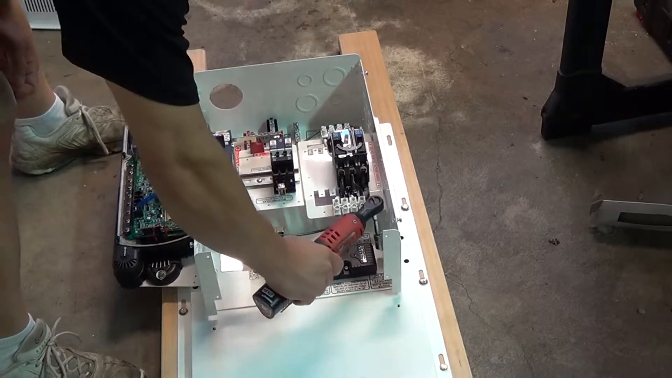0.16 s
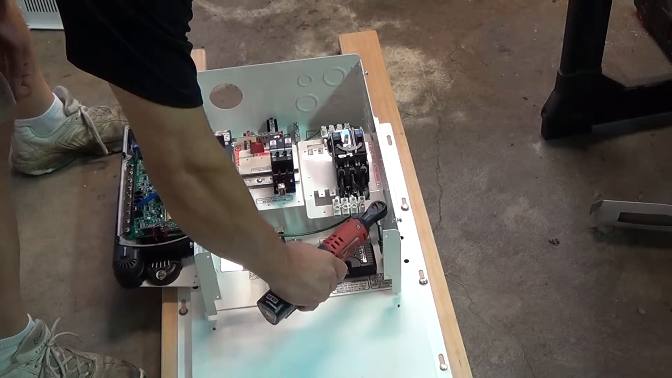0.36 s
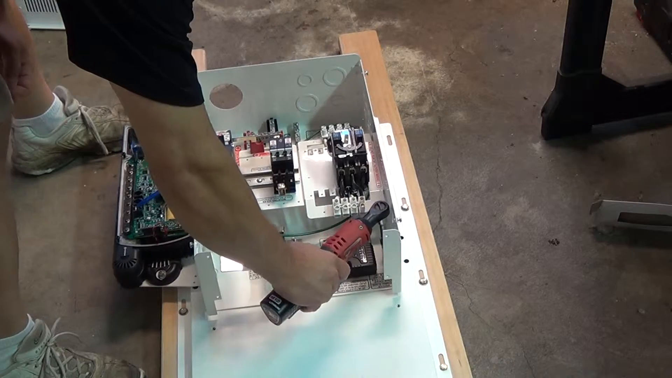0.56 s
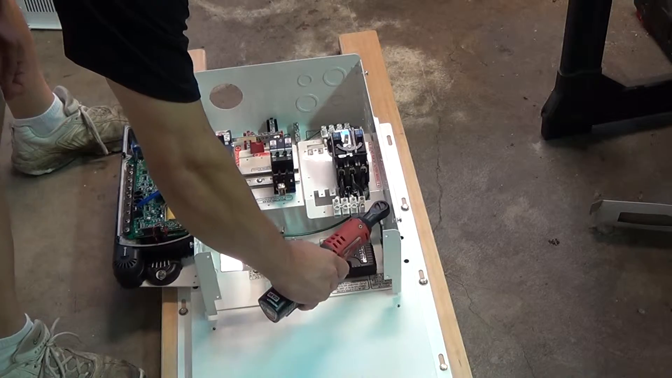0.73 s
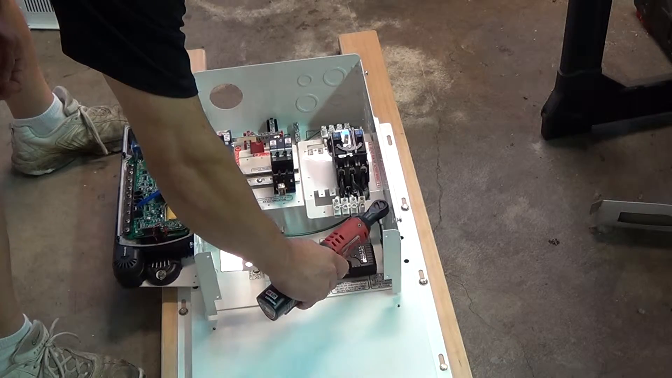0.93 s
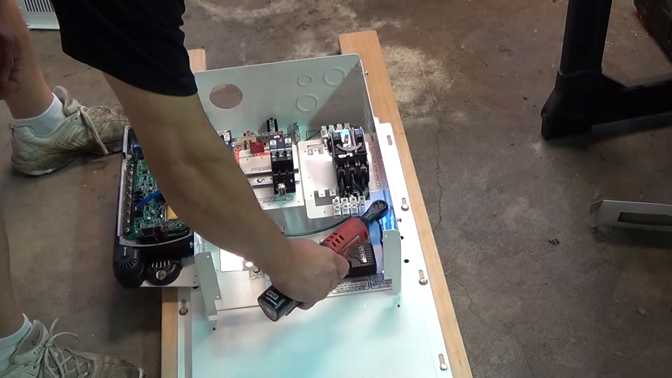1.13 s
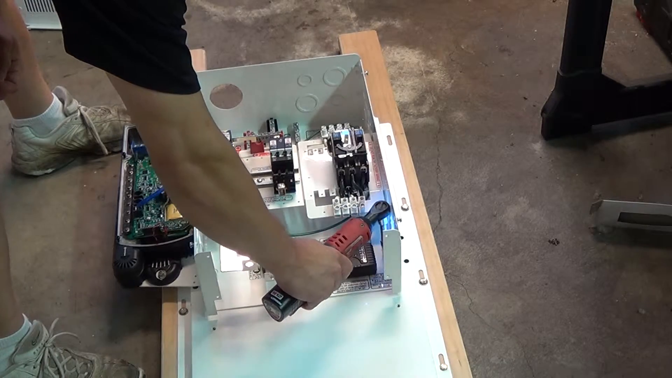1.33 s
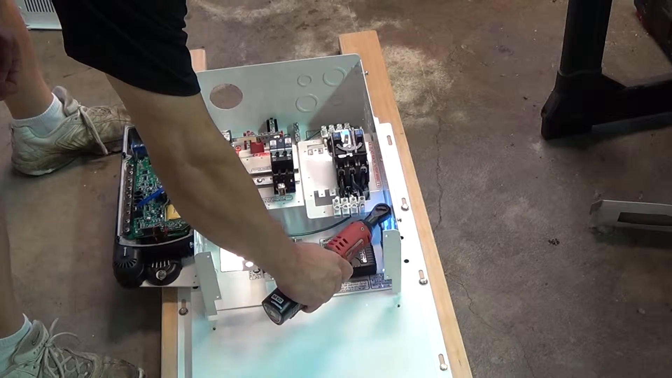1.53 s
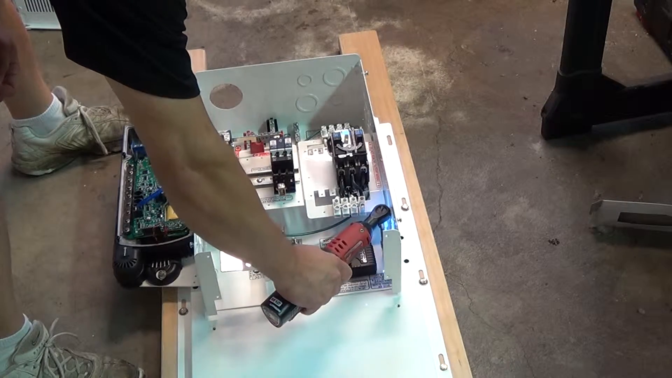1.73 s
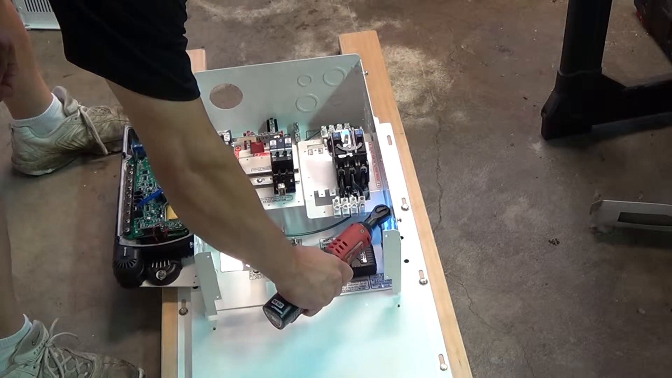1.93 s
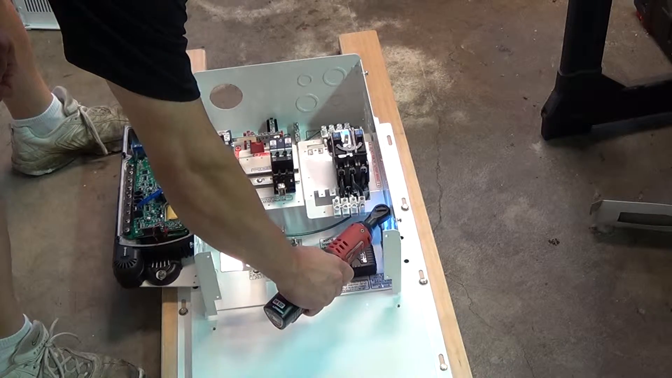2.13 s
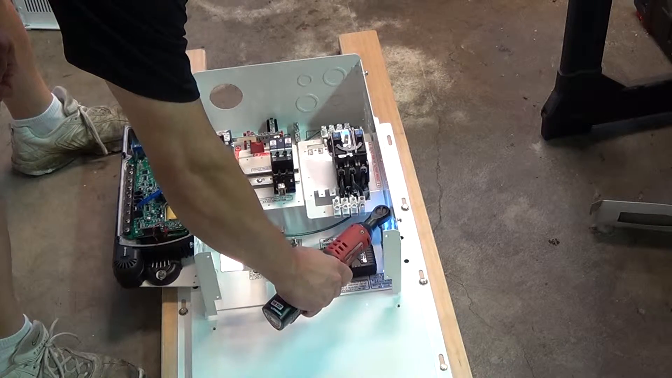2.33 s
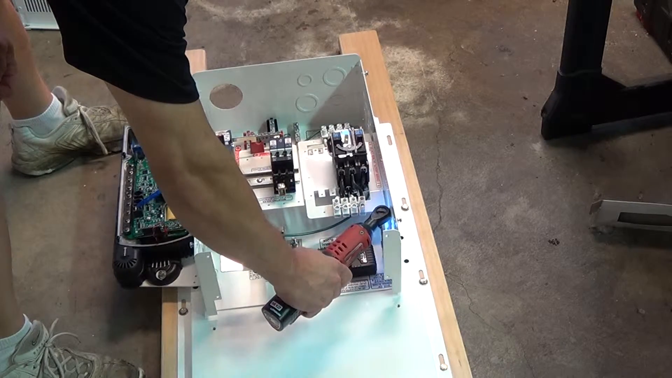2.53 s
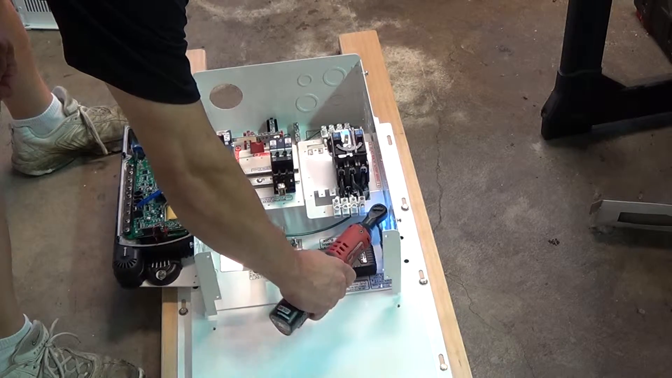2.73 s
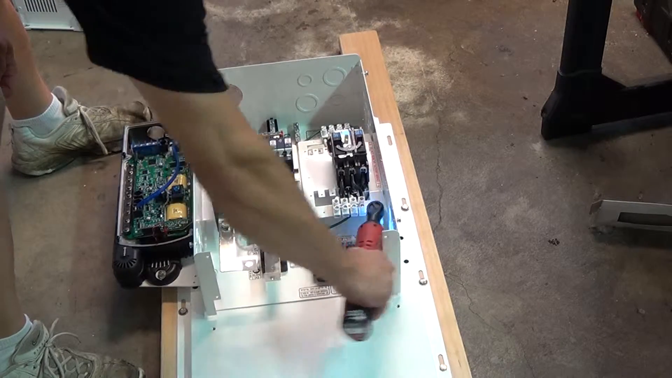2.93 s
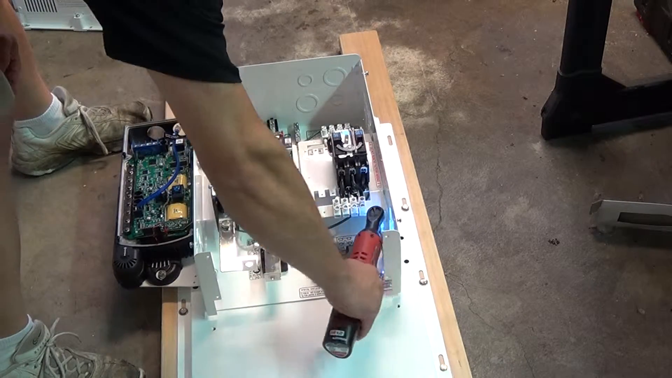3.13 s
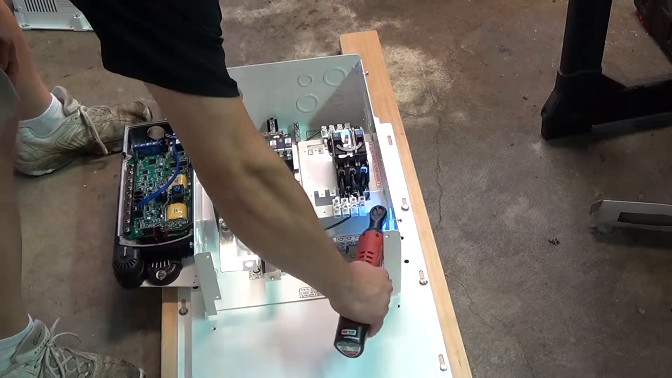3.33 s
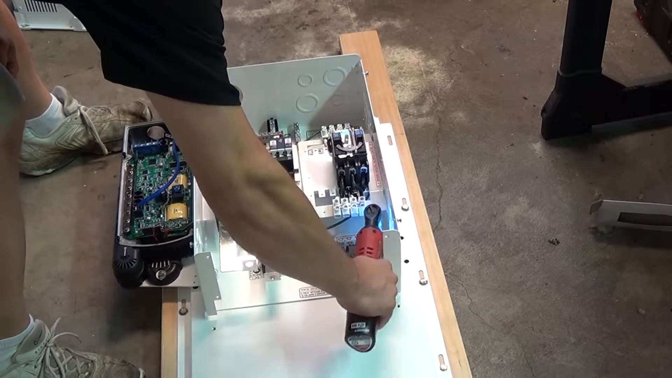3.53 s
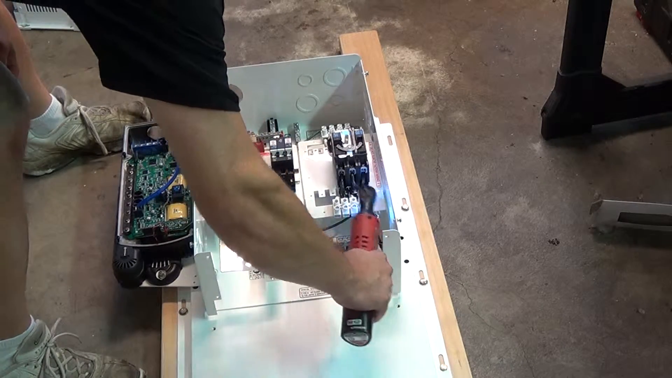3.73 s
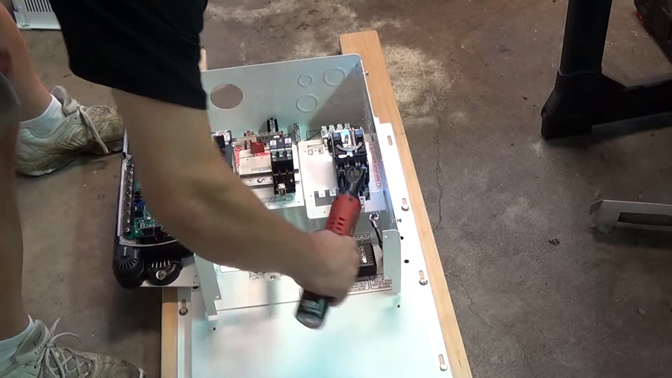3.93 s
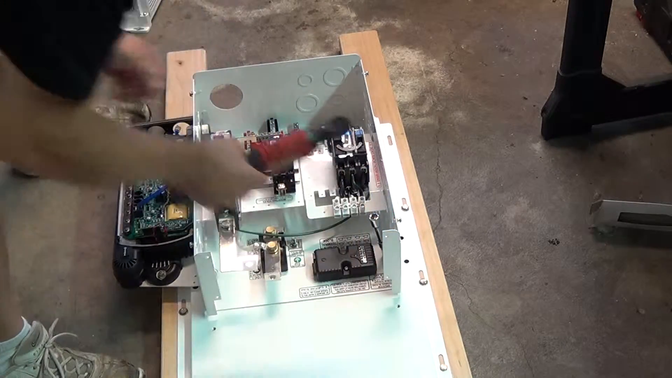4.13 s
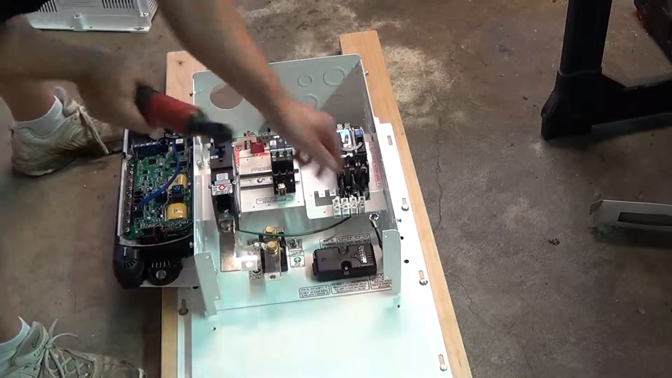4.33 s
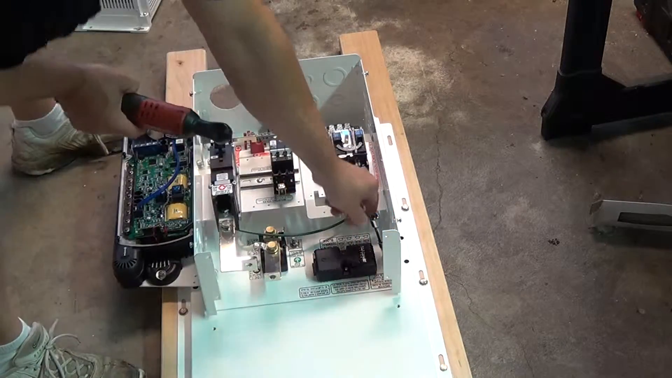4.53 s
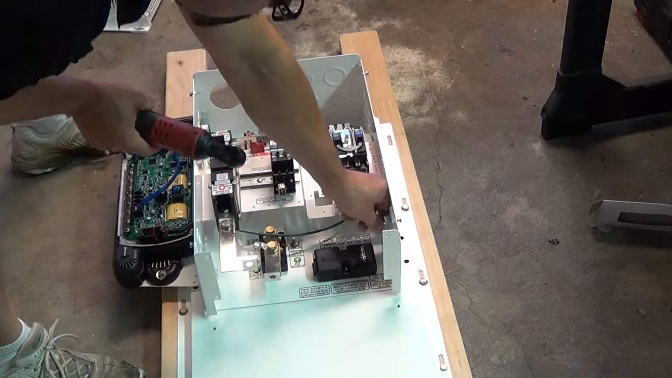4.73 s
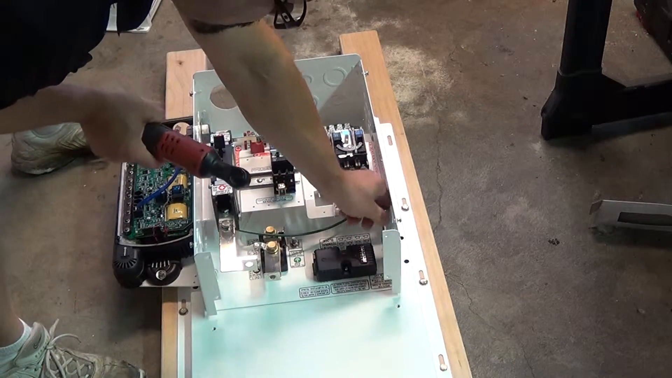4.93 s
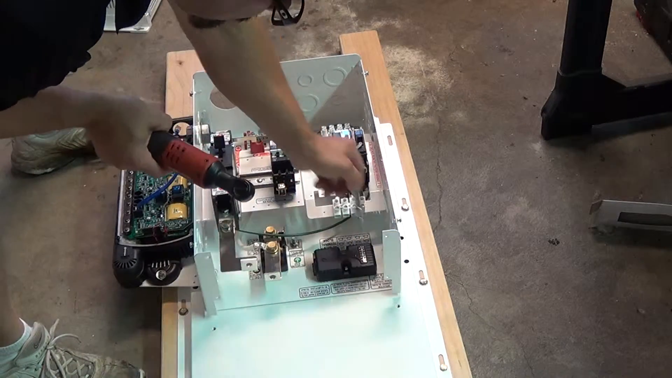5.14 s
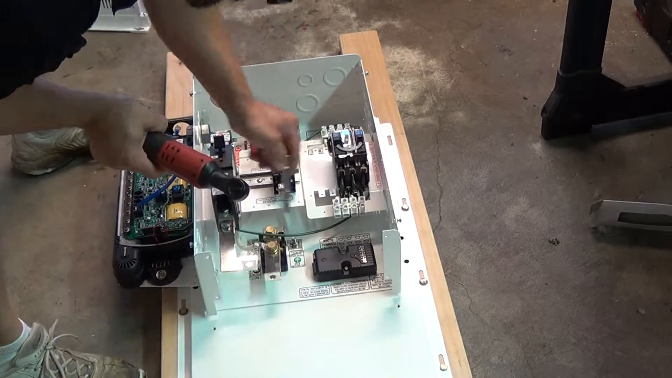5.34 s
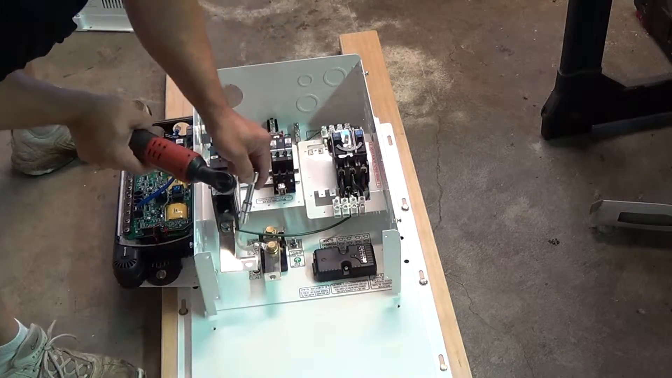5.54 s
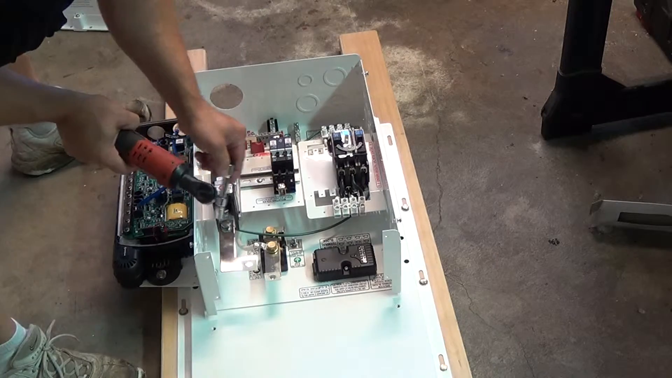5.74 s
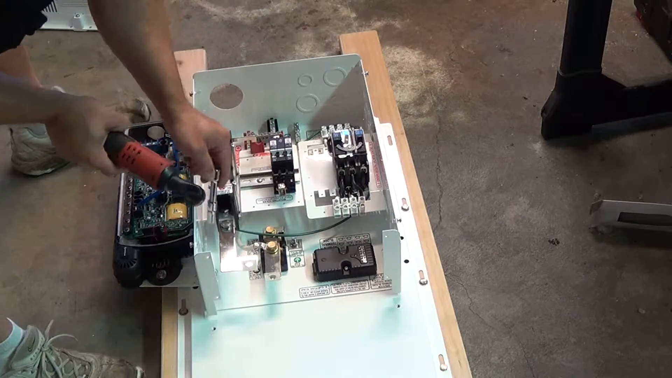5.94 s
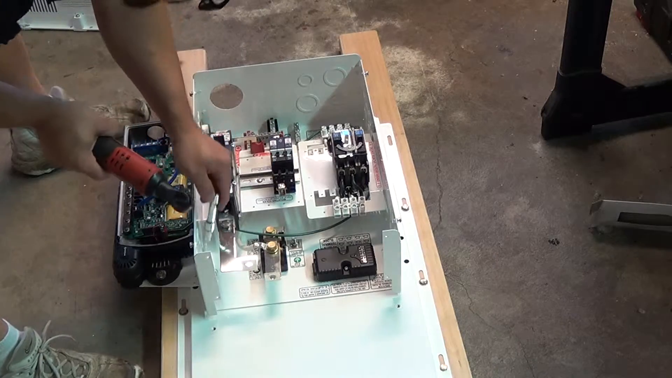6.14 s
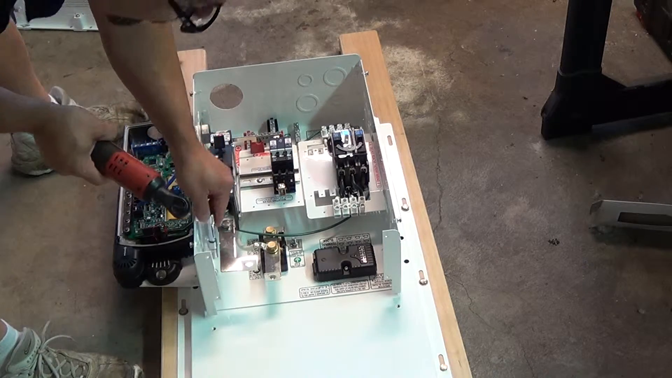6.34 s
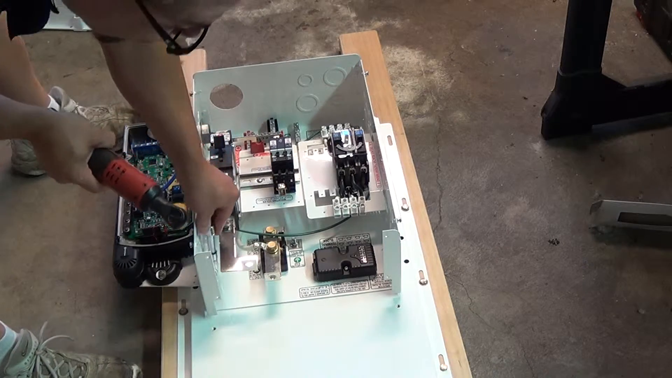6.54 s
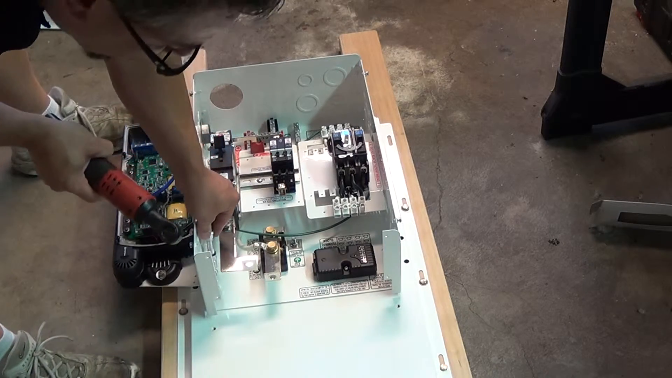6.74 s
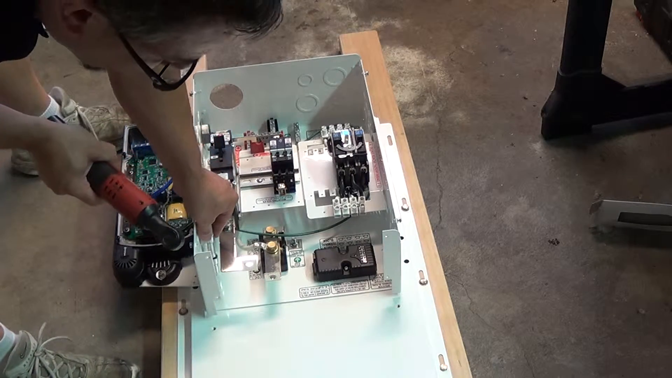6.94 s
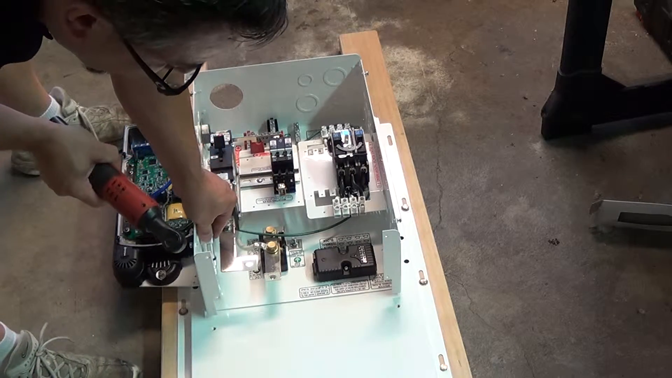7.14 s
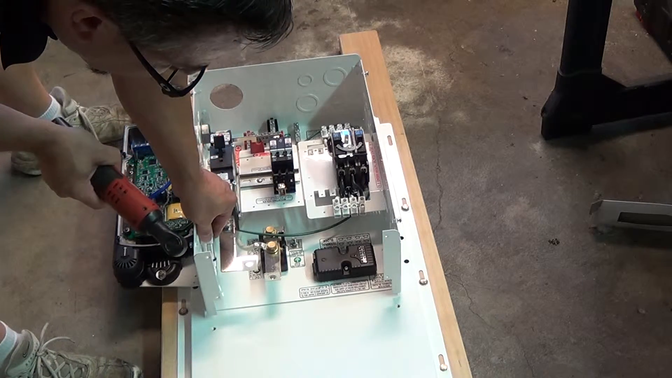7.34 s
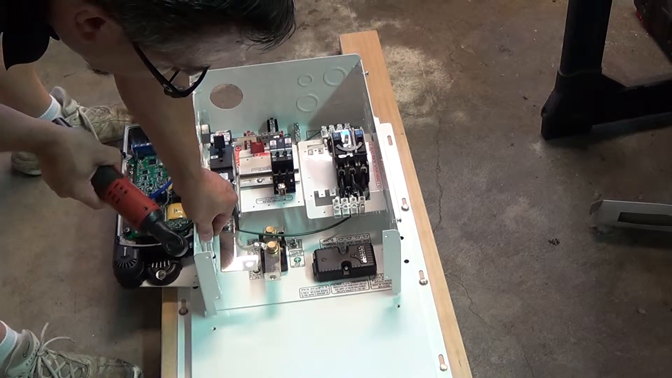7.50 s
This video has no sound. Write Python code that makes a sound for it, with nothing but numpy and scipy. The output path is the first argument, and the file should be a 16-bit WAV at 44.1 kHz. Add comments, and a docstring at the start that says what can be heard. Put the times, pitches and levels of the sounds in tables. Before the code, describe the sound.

Over faint air hiss and low throbbing hum, a socket knocks lightly on a sheet-metal box. A cordless ratchet then whirs up abruptly, a coarse, rasping mechanical buzz with rapid clicking, runs evenly, then sags and groans as the bolt tightens. It coasts out quickly. Small taps follow, a loud metal clatter, a pause, and finally crisp steel clicks. Close stereo pickup in a lightly echoing garage.

```python
"""First come knocks and clatter, over a low hum, as a socket is seated in a sheet-metal box in a garage.
A cordless ratchet then runs a bolt down: its motor spins up, sags as the bolt tightens and coasts out.
Gears, teeth and pawl follow the turning of one crank; the strained box groans, shakes and buzzes.
Then the tool is lifted and metal parts clatter and snap: short noise bursts that ring the metal.
Underneath lie air hiss, the throbbing hum and the faint ticking and whistle of a tape camera."""
import sys
import numpy as np
from scipy import signal
from scipy.fft import rfft, irfft, next_fast_len
from scipy.io import wavfile

SR = 44100
rng = np.random.default_rng(int(sys.argv[2]) if len(sys.argv) > 2 else 0)


def transcribe(signal):
    """Save signal, clipped to [-1, 1], as a 16-bit WAV file at the path in sys.argv[1]."""
    frames = np.atleast_2d(signal).T
    limited = np.clip(frames, -1, 1)
    pcm = np.round(limited * 32767).astype(np.int16)
    wavfile.write(sys.argv[1], SR, pcm)


N = 338247
TIME = np.arange(N) / SR  # seconds

# Moments of the run [s]: trigger pressed, gears take up, trigger let go, rotor stops
PRESS_S, ENGAGE_S, RELEASE_S, STOP_S = 1.178, 1.241, 3.049, 3.228
# Motor: unloaded strokes per second; time constants of spinning up and coasting
FREE_HZ, SPIN_UP_S, COAST_S = 79.3, 0.062, 0.19
# How long the drive takes to go slack, and the rotor to halt
SLACK_S, HALT_S = 0.039, 0.098
# Load on the motor: a jolt at the start, then free running, then the bolt biting:
# (time [s], share of the speed lost [0-1])
MOTOR_LOAD = [(1.24, 0.12), (1.42, 0.061), (1.6, .025), (2.66, 0.021), (2.78, .075), (2.86, .18),
              (2.94, .33), (3.05, .44)]

# Snaps of the pawl in one stroke: (place [share of stroke], level [dB], ring [Hz], ring width [Hz])
PAWL_SNAPS = [(0.018, -2.5, 12750, 795), (0.172, -8.5, 12270, 900), (.31, -10, 10500, 1600),
              (0.438, -7.5, 10180, 2205)]
# Tone colour of the gears' growl: (frequency [Hz], relative level [dB per Hz])
GROWL_COLOUR = [(110, -59.5), (180, -21.5), (298, -6.5), (333, -15), (376, -7), (487, -6), (532, 1.5),
                (636, -3), (752, -0.5), (841, 1), (2600, -5), (3380, -15.5), (5720, -120)]
# Tone colour of the rasping teeth: (frequency [Hz], relative level [dB])
RASP_COLOUR = [(1180, -34), (2000, -3.5), (2140, -1.5), (3280, -3.5), (3550, -1.5), (5210, -0.5),
               (7120, -2.5), (8630, -2.5), (10500, 1.5), (11600, -0.5), (12800, -15), (13300, -1.5),
               (13900, -6.5), (15200, -11), (16000, -38)]
# Loudness of each part, before the mix: (running free [dB], extra per unit load [dB],
# rise until the gears take up [dB/s], drop on going slack [dB], fade while coasting [dB/s])
GROWL_LOUDNESS = (-26, 19, 451, 6, 68)
RASP_LOUDNESS = (-19, 0, 778, 11, 95)
PAWL_LOUDNESS = (-21, -14.5, 903, 4, 150)

# Notes that the strain sets ringing: (frequency [Hz], width [Hz], level [dB])
GROAN_NOTES = [(274, 72, 6.5), (519, 280, 6), (728, 87, 3.5), (1120, 230, -5.5), (1548, 196, 4)]
# Strained box, before the mix: (level at a load of 1 [dB], power of the load by which it grows)
GROAN_STRAIN = (-26.5, 1.19)
SHUDDER_STRAIN = (-34.5, 1)
SHAFT_STRAIN = (-10, 0.77)
STRAIN_RELAX_S = 0.05  # time constant once the trigger is let go
# The box resonance that the shaft tone sounds through; its time constant of coming in
SHAFT_HZ, SHAFT_WIDTH_HZ, SEATING_S = 298, 54, 0.446
# The box buzzes up when the tool leans on it: (time [s], level [dB], length [s])
LEANS = [(1.265, -24.5, 0.023), (1.437, -17, 0.0083), (1.72, -23, 0.028), (2.577, -27.5, 0.0093),
         (2.688, -26, 0.015), (2.84, -28.5, 0.04)]
# Stirring of the box between the loud buzzes: (level [dB], spread [dB], rate of change [Hz])
QUIET_STIR = (-44, 6.2, 6)
BUZZ_LO_HZ, BUZZ_HI_HZ = 1004, 2590

# The speed controller's song: (multiple of the switching rate, level [dB])
SONG_TONES = [(1, 4), (2, 3.5), (3, 4.5), (4, -3), (6, -12), (7, -18)]
SWITCHING_HZ, SWITCHING_DB = 1858, -49.5
# Thin ringing of the steel head as the drive goes slack: (frequency [Hz], width [Hz], level [dB])
SLACK_NOTES = [(10200, 200, 2), (12500, 220, -6), (14500, 250, -1), (15450, 200, -8)]
SLACK_RING_DB, SLACK_RING_S = -25, 0.035  # level, decay time constant

# Notes of the sheet-metal box: (frequency [Hz], width [Hz], level against the bare contact [dB])
BOX_NOTES = [(262.8, 14, 8.5), (300.3, 5.4, 9.5), (378.6, 21.5, 10.5), (554.5, 24, -6), (658, 19, -1.5),
             (754, 7.3, -0.5), (887, 11, 2.5), (1006, 24, -0.5), (1373, 210, -4.5), (1526, 32.8, -1),
             (1670, 140, -6), (1993, 19, -9.5), (2100, 11, -19)]
# Notes of the steel socket and ratchet head: (frequency [Hz], width [Hz], level against the contact [dB])
STEEL_NOTES = [(554, 54, -1.5), (1324, 47, -7), (1846, 70, 10.5), (3850, 520, 10.5), (4500, 130, 17.5),
               (5080, 220, 18), (5500, 150, -2), (9430, 130, 11), (10380, 120, -1)]
# Edges of the five registers of a knock, tick or snap: (frequency [Hz])
REGISTER_EDGES = [215, 450, 1100, 2800, 7000, 12000]
# Knocks on the box, and two dry ticks of the pawl as the run starts and ends:
# (time [s], thud [dB], clatter [dB], clatter tilt [dB/octave],
# rattle decay in the middle register [s], panel note [Hz], ring of that note [dB])
KNOCKS_AND_TICKS = [(.52, -40, -30.5, -1.5, 0.02, 263, 15), (.656, -34, -32, -6, 0.011, 712, 8),
                    (1.069, -61, -63, -4.5, 0.0098, 460, 4), (1.231, -34.5, -41.5, 4.5, 0.0022, 545, 10),
                    (3.255, -59, -46.5, -3, 0.002, 416, 0), (3.406, -37, -53, -2, 0.0069, 506, 14.5),
                    (3.448, -48, -55, -1, 0.016, 560, 2), (3.58, -50, -50, -3, 0.022, 795, 6),
                    (3.654, -39, -41.5, 0.2, 0.015, 760, 10), (3.762, -35, -51, -2.7, 0.011, 463, 15),
                    (3.787, -43, -52, -0.5, 0.014, 288, 17), (4.677, -37.5, -31, -1.6, 0.024, 820, 16),
                    (4.752, -25, -21, -1.5, 0.034, 686, 12.5), (4.784, -34, -23, -1.5, 0.02, 756, 11),
                    (4.893, -49, -42, 1, 0.012, 360, 3), (5.008, -27.5, -24.5, -3, 0.0086, 417, 13.5),
                    (7.065, -40, -37, -7, 0.015, 555, 14), (7.185, -44.5, -48, -7, 0.0074, 563, 10),
                    (7.283, -40, -52, -17, 0.004, 676, -4), (7.605, -46, -49, -3, 0.0088, 275, 6)]
# Snaps of the socket and ratchet head: (time [s], thud [dB], clatter [dB], clatter tilt [dB/octave],
# rattle decay in the middle register [s], panel note [Hz], ring of that note [dB])
STEEL_SNAPS = [(7.228, -38.5, -28, -1.2, 0.01, 867, 3), (7.488, -44.5, -40.5, -3.6, 0.011, 504, 0)]
# Colour of the knocks and ticks: (frequency [Hz], added level [dB])
KNOCK_COLOUR = [(300, -1), (700, -0.5), (1750, -0.5), (4400, -2), (9200, -2)]
# Colour of the steel snaps: (frequency [Hz], added level [dB])
SNAP_COLOUR = [(300, -2), (700, 1.5), (1750, 1.5), (4400, 6), (9200, -3)]
BASS_FALL_DB = 8.5  # per octave below the panel note
# Scrapes and short bursts of contact noise, several of them at the knocks:
# (time [s], level [dB], length [s], lowest [Hz], highest [Hz])
CONTACT_BURSTS = [(0.65, -39, 0.0049, 500, 7000), (3.14, -31.5, 0.0065, 1500, 12000),
                  (3.602, -56, 0.065, 1280, 1880), (3.648, -39, 0.0026, 1200, 11900),
                  (3.8, -50.5, 0.034, 4950, 12500), (4.517, -62, .14, 7500, 13000),
                  (4.648, -55, 0.03, 218, 1500), (4.754, -21.5, 0.0096, 1200, 12000),
                  (4.963, -37.5, 0.012, 250, 8750), (5.92, -60, 0.019, 1000, 11000),
                  (6.658, -61, 0.022, 5460, 12000), (7.432, -52, 0.012, 250, 4000)]

# Dying away of the garage's echoes: (frequency [Hz], time to fall 60 dB [s])
GARAGE_DECAY = [(250, 0.52), (700, 0.34), (2000, 0.28), (5000, 0.26), (12000, 0.24)]
# Sound that differs between the two ports: (frequency [Hz], level [dB])
STEREO_WIDTH = [(250, -25), (1000, -6.5), (4000, -4.5), (6300, -10.5), (8000, -6), (10000, -12),
                (12000, -32), (14000, -37.5)]
# The two microphone ports: (frequency [Hz], lead of left [radians], extra level of left [dB])
PORT_DIFFERENCE = [(60, 0, 0.5), (140, 0.27, -2.4), (260, 0.5, 0.5), (938, 0.8, 0.5), (1300, 0.32, 0.1),
                   (3000, 0.53, 1.5), (7000, .06, 0.5), (11000, 0, 0)]
# Colour of the air hiss, before its peaks are capped: (frequency [Hz], relative level [dB per Hz])
HISS_COLOUR = [(15, -29), (25, -3), (54, 20), (167, -19.5), (286, -18), (790, -24), (856, -4),
               (1000, -28.5), (1090, -24.5), (2850, -27.5), (3180, -28.5), (3930, -31), (15000, -36)]
HISS_DB = -58.5
# Machine hum: (multiple of its rate, relative level [dB])
HUM_TONES = [(2, 6), (3, 3), (4, -5), (5, -5.5)]
HUM_HZ = 21.53
# Loudness of the hum: (time [s], level [dB])
HUM_LOUDNESS = [(0, -59.5), (1.2, -59.5), (1.4, -82), (3.3, -64), (5.2, -55.5), (7.67, -54)]
TOP_HZ = 16000  # nothing much is left above this


def ratchet():
    """A crank rocks the yoke: gears growl into the box, teeth rasp, and the pawl snaps in every stroke."""
    unsteady = 1 + 0.003 * drift(14) + 0.012 * drift(2.5)
    turns = np.cumsum(speed() * unsteady) / SR  # strokes made so far
    stroke = 1 + 0.077 * np.cos(2 * np.pi * (turns - 0.6))
    rasp = loudness(*RASP_LOUDNESS) * rasping_teeth(turns, stroke)
    snaps = loudness(*PAWL_LOUDNESS) * driven(pawl(turns))
    return turning() * (gears(turns, stroke) + rasp + snaps + controller() + slack_ring())


def gears(turns, stroke):
    """Meshing gears make a coarse grind and a stack of tones, which the box colours and answers."""
    noise = rng.standard_normal(N)
    mesh = 0.39 + np.exp(-(turns * 4 % 1) / 0.2316)  # four bites a stroke
    grind = driven(stroke * mesh * amp(2.25 * drift(50)) * noise)
    stack = tone_stack(turns)
    growl = driven(shaped(body(grind + 0.16 * stack, BOX_NOTES), GROWL_COLOUR))
    teeth = grind + 0.28 * stack
    strained = strain(*GROAN_STRAIN) * groan(teeth)
    strained += strain(*SHUDDER_STRAIN) * shudder(turns, noise)
    strained += strain(*SHAFT_STRAIN) * shaft_tone(turns)
    return loudness(*GROWL_LOUDNESS) * growl + strained + box_buzz(teeth)


def tone_stack(turns):
    """Gear tones at whole multiples of the stroke rate, each wavering in strength and phase."""
    wobble = [drift(4.9) for _ in range(7)]
    stack = np.zeros(N)
    for k in range(3, 34):
        phase = 2 * np.pi * (k * turns + rng.random()) + 0.6 * wobble[k % 5]
        stack += amp(2.55 * wobble[k % 7]) * np.cos(phase)
    return driven(stack)


def groan(teeth):
    """The gear noise sets a few broad notes ringing; each is filtered twice to make it purer."""
    return sum(amp(db) * driven(ring_twice(teeth, hz, width)) for hz, width, db in GROAN_NOTES)


def shudder(turns, noise):
    """The reaction torque shakes the box twice a stroke, with some rough low noise."""
    shake = np.sin(2 * np.pi * 2 * turns + 0.86 * drift(24.3))
    rough = 0.47 * unit(band(noise, 68, 176))
    return band(shake + rough, 64.3, 180, order=4)


def shaft_tone(turns):
    """A tone, four times a stroke, comes in as the socket seats and sings out near a box resonance."""
    tone = np.sin(2 * np.pi * 4 * turns + 0.15 * drift(17))
    seated = 1 - np.exp(-since(ENGAGE_S) / SEATING_S)
    return ring_twice(tone * seated, SHAFT_HZ, SHAFT_WIDTH_HZ)


def box_buzz(teeth):
    """The box buzzes up when the tool leans on it, and stirs quietly in between."""
    stir_db, spread_db, rate_hz = QUIET_STIR
    leaning = sum(swell(*row) for row in LEANS)
    leaning += amp(stir_db + spread_db * drift(rate_hz))
    held = (TIME > ENGAGE_S) * np.exp(-since(RELEASE_S) / STRAIN_RELAX_S)
    return leaning * held * driven(band(teeth, BUZZ_LO_HZ, BUZZ_HI_HZ))


def rasping_teeth(turns, stroke):
    """Teeth scrape seven times a stroke, each contact starting sharply and easing off."""
    teeth = (0.35 + np.exp(-(turns * 7 % 1) / 0.35)) * amp(2.5 * drift(160))
    scrape = shaped(stroke * teeth * rng.standard_normal(N), RASP_COLOUR)
    # each register of the rasp swells and fades at random, on its own
    flare = np.zeros(N)
    for lo in (2230.4, 3180, 4680, 7880):
        flare += drift(9.7) * band(scrape, lo, 1.48 * lo, order=2)
    return driven(scrape + 0.16 * flare)


def pawl(turns):
    """The pawl snaps over the teeth several times a stroke, each time with a short steel chatter."""
    fade = np.exp(-np.arange(400) / SR / 0.0005)
    out = np.zeros(N)
    for share, db, hz, width in PAWL_SNAPS:
        clicks = strikes(turns, share, jitter_s=0.00011, spread_db=1.0)
        chatter = signal.oaconvolve(clicks, fade)[:N] * rng.standard_normal(N)
        ring = unit(band(chatter, hz - width / 2, hz + width / 2, order=2))
        out += amp(db + 1.5 * drift(9)) * ring
    return out


def strikes(turns, share, jitter_s, spread_db):
    """One click of uneven strength each time the crank passes a point of its stroke."""
    at = np.flatnonzero(np.diff(np.floor(turns - share)) > 0)
    slip, size = rng.standard_normal((len(at), 2)).T
    places = at + (slip * jitter_s * SR).astype(int)
    clicks = np.zeros(N)
    clicks[np.clip(places, 0, N - 1)] = amp(spread_db * np.clip(size, -2, 2))
    return clicks


def controller():
    """The switched motor current sings from the press of the trigger until the gears take up."""
    song = sum(amp(db) * np.sin(2 * np.pi * k * SWITCHING_HZ * TIME) for k, db in SONG_TONES)
    # ramps of 6.6 ms at both ends
    gate = np.clip(np.minimum(TIME - PRESS_S, ENGAGE_S - TIME) / 0.0066, 0, 1)
    return amp(SWITCHING_DB) * gate * song


def slack_ring():
    """Let go, the steel head rings thinly for a moment: noise through a few narrow resonances."""
    noise = rng.standard_normal(N)
    ring = unit(sum(amp(db) * ring_twice(noise, hz, width) for hz, width, db in SLACK_NOTES))
    age = since(RELEASE_S)
    return amp(SLACK_RING_DB) * np.minimum(age / 0.005, 1) * np.exp(-age / SLACK_RING_S) * ring


def load():
    """Share of the motor's speed that is lost to its load."""
    return np.clip(curve(MOTOR_LOAD), 0.001, 0.9)


def speed():
    """Strokes per second: the motor spins up, sags under load and coasts once let go."""
    spin_up = 1 - np.exp(-since(PRESS_S) / SPIN_UP_S)
    coast = np.exp(-since(RELEASE_S) / COAST_S)
    return FREE_HZ * spin_up * (1 - load()) * coast


def turning():
    """1 while the rotor turns, closing as it halts."""
    return (TIME > PRESS_S) * np.clip((STOP_S - TIME) / HALT_S, 0, 1)


def loudness(free_db, load_db, rise_db_per_s, slack_db, fade_db_per_s):
    """A part swells until the gears take up, follows the load, drops as the drive goes slack and fades."""
    rise = rise_db_per_s * np.maximum(ENGAGE_S - TIME, 0)
    slack = slack_db * np.minimum(since(RELEASE_S) / SLACK_S, 1)
    fade = fade_db_per_s * since(RELEASE_S)
    return amp(free_db + load_db * load() - rise - slack - fade)


def strain(full_db, power):
    """Torque on the box grows with the load and relaxes once the trigger is let go."""
    take_up = np.minimum(since(ENGAGE_S) / 0.01, 1)
    relax = np.exp(-since(RELEASE_S) / STRAIN_RELAX_S)
    return amp(full_db) * load() ** power * take_up * relax


def driven(x):
    """Scales to an even strength (standard deviation 1) over the time that the motor drives."""
    return x / np.std(x[(TIME > ENGAGE_S) & (TIME < RELEASE_S)])


def impacts(rows, modes, spectrum, rise_s, bass_slow, crack):
    """A crack and a dying rattle ring the metal: thud below, clatter above, low registers dying slower."""
    out, t = np.zeros(N), np.arange(SR // 3) / SR
    clatter_edge, middle_top = REGISTER_EDGES[2], REGISTER_EDGES[3]
    middle = np.sqrt(clatter_edge * middle_top)
    for s, thud_db, clatter_db, tilt_db, decay, note_hz, note_db in rows:
        panel = [(note_hz, 26, note_db)]
        for lo, hi in zip(REGISTER_EDGES, REGISTER_EDGES[1:]):
            centre = np.sqrt(lo * hi)
            if lo < clatter_edge:
                db = thud_db - BASS_FALL_DB * max(np.log2(note_hz / centre), 0)
            else:
                db = clatter_db + tilt_db * np.log2(centre / middle)
            fade = max(decay, 0.001) * (middle_top / hi) ** bass_slow
            contact = (1 - np.exp(-t / rise_s)) * np.exp(-t / fade) * rng.standard_normal(len(t))
            # the crack is one strong sample, 2.5 ms in
            contact[SR // 400] += crack * np.linalg.norm(contact) * np.sqrt(REGISTER_EDGES[1] / hi)
            ring = band(body(contact, modes + panel), lo, hi, order=4)
            early = np.std(ring[:SR // 30])  # strength over the first 33 ms
            add(out, s - 0.0015, amp(db + read(spectrum, centre)) * ring / early)
    return out


def contact_bursts():
    """Scrapes and short contacts between parts: bursts of noise, each in its own band."""
    noise = rng.standard_normal(N)
    return sum(swell(s, db, length) * unit(band(noise, lo, hi)) for s, db, length, lo, hi in CONTACT_BURSTS)


def echoes(x):
    """Garage echoes: sparse reflections of random sign, each band dying at its own speed."""
    at = np.arange(140, SR // 2, 16)
    taps = np.zeros(SR)
    taps[at + rng.integers(0, 16, len(at))] = rng.choice([-1., 1.], len(at))
    hz, t, z = signal.stft(taps, SR, nperseg=256)
    dying = amp(-60 * t / read(GARAGE_DECAY, hz)[:, None])
    tail = signal.istft(z * dying, SR, nperseg=256)[1]
    return signal.fftconvolve(x, tail / np.linalg.norm(tail))[:N]


def background():
    """Everything that lies underneath: air hiss, machine hum, and the tape camera's tick and whistle."""
    return hiss() + machine_hum() + drum_ticks() + line_whistle()


def hiss():
    """Steady air noise of the garage; no part of its colour stands above its level at 166 Hz."""
    cap = read(HISS_COLOUR, 166.0)
    capped = [(hz, min(db, cap)) for hz, db in HISS_COLOUR]
    return amp(HISS_DB) * shaped(rng.standard_normal(N), capped)


def machine_hum():
    """A few multiples of one low rate add up to a throbbing hum, which wavers slightly in phase."""
    hum = sum(amp(db) * np.cos(2 * np.pi * k * HUM_HZ * TIME + 0.15 * drift(2.7)) for k, db in HUM_TONES)
    return amp(curve(HUM_LOUDNESS)) * unit(hum)


def drum_ticks():
    """The tape camera's spinning head drum gives one tiny rising chirp a turn, 29.97 turns a second."""
    turn = (TIME * 29.97 + 0.82) % 1 - 0.5
    chirp = np.sin(2 * np.pi * np.cumsum(3180 + 1500 * turn) / SR)
    return amp(-57.5) * np.exp(-(turn / 0.092) ** 2) * chirp


def line_whistle():
    """The tape camera's line whistle: a very high tone with a trembling phase."""
    return amp(-67.0) * np.sin(2 * np.pi * 15734 * TIME + 0.7 * drift(120))


def port(x, sign):
    """One microphone port: +1 is left, -1 is right; each takes half of the difference between them."""
    table = np.array(PORT_DIFFERENCE)
    lead, louder = table[:, :2], table[:, ::2]

    def gain_at(hz):
        """Phase lead and level of this port at each frequency."""
        return np.exp(0.5j * sign * read(lead, hz)) * amp(0.5 * sign * read(louder, hz))

    return colour(x, gain_at)


def amp(db):
    """Decibels to gain."""
    return 10 ** (np.asarray(db) / 20)


def unit(x):
    """Scales to an average strength (rms) of 1."""
    return x / np.sqrt(np.mean(x ** 2) + 1e-20)


def since(s):
    """Seconds gone by since time s, zero before it."""
    return np.maximum(TIME - s, 0)


def swell(s, db, length):
    """A soft rise and fall around time s."""
    return amp(db) * np.exp(-((TIME - s) / length) ** 2)


def curve(rows, axis=1):
    """One column of a time table at every sample."""
    rows = np.array(rows)
    return np.interp(TIME, rows[:, 0], rows[:, axis])


def read(points, hz):
    """Reads a frequency table between its rows, on a log-frequency axis."""
    f, value = np.transpose(points)
    return np.interp(np.log(hz + 1), np.log(f + 1), value)


def colour(x, gain_at):
    """Filters x by a gain that is a function of frequency."""
    size = next_fast_len(len(x) + 4096)
    spectrum = rfft(x, size) * gain_at(np.fft.rfftfreq(size, 1 / SR))
    return irfft(spectrum, size)[:len(x)]


def shaped(x, points):
    """Filters x by the levels of a table, then scales it to rms 1."""
    return unit(colour(x, lambda hz: amp(read(points, hz))))


def band(x, lo_hz, hi_hz, order=3):
    """Keeps the sound between two frequencies."""
    edges = [lo_hz, min(hi_hz, SR / 2 - 1)]
    return signal.sosfilt(signal.butter(order, edges, "band", fs=SR, output="sos"), x)


def resonate(x, hz, width):
    """One resonance, with a gain of 1 at its peak."""
    return signal.lfilter(*signal.iirpeak(hz, hz / width, SR), x)


def ring_twice(x, hz, width):
    """The same resonance twice in a row, for a purer ring."""
    return resonate(resonate(x, hz, width), hz, width)


def body(x, modes):
    """The contact sound plus the notes it rings in the metal."""
    return x + sum(amp(db) * resonate(x, hz, width) for hz, width, db in modes)


def drift(rate_hz):
    """Slow random wandering of rms 1; a higher rate wanders faster."""
    return unit(colour(rng.standard_normal(N), lambda hz: np.exp(-(hz / rate_hz) ** 2)))


def add(mix, s, sound):
    """Lays a sound into the mix at time s."""
    part = mix[round(s * SR):][:len(sound)]
    part += sound[:len(part)]


def scene():
    """Tool and metal contacts sound in the garage and reach a close pair of microphone ports."""
    tool = ratchet()
    hits = impacts(KNOCKS_AND_TICKS, BOX_NOTES, KNOCK_COLOUR, rise_s=0.0033, bass_slow=0.39, crack=0.36)
    hits += contact_bursts()
    hits += impacts(STEEL_SNAPS, STEEL_NOTES, SNAP_COLOUR, rise_s=0.0023, bass_slow=0.7, crack=0.31)
    send = amp(-8.0) * tool + amp(-4.5) * hits  # what goes out into the room
    mid = amp(-2.3) * tool + hits + echoes(send) + background()
    # fresh echoes and hiss, added on the left and taken away on the right, widen the sound
    side = colour(echoes(send) + hiss(), lambda hz: amp(read(STEREO_WIDTH, hz)))
    return np.array([port(mid + side, 1), port(mid - side, -1)])


def record(dry):
    """Peaks round off softly below a ceiling; then the highest treble is cut."""
    ceiling = amp(-6.0)
    rounded = ceiling * np.tanh(dry / ceiling)
    low_pass = signal.firwin(511, TOP_HZ, window=("kaiser", 9), fs=SR)
    return signal.oaconvolve(rounded, low_pass[None], "same")


dry = scene()
out = record(dry)
transcribe(out)
```